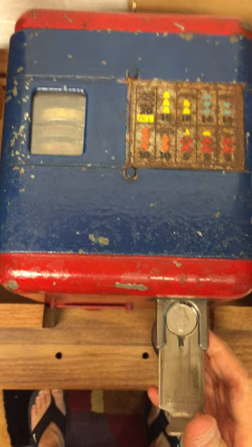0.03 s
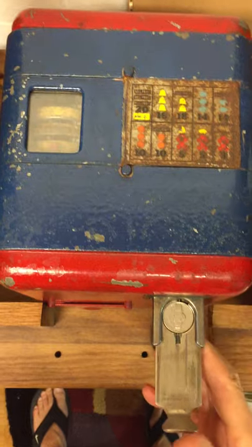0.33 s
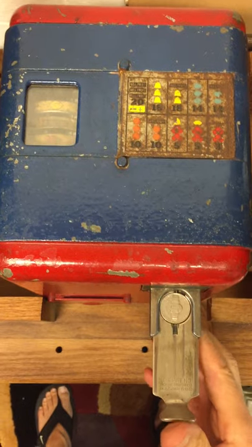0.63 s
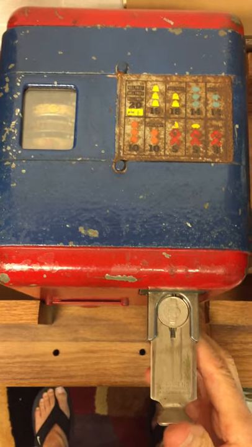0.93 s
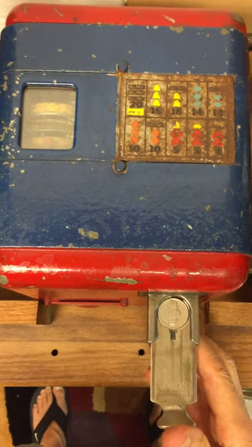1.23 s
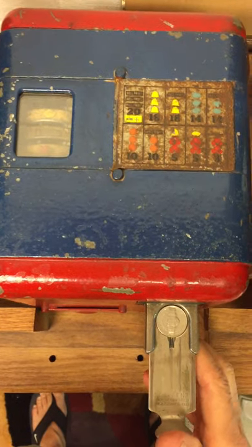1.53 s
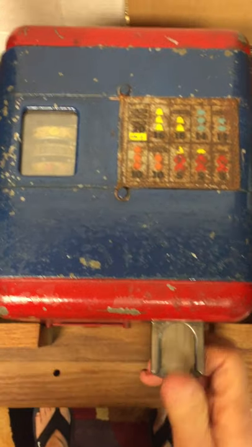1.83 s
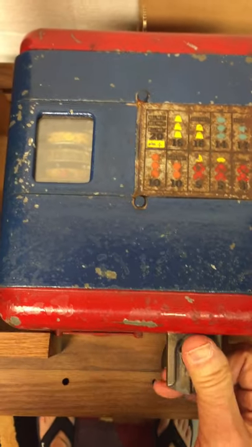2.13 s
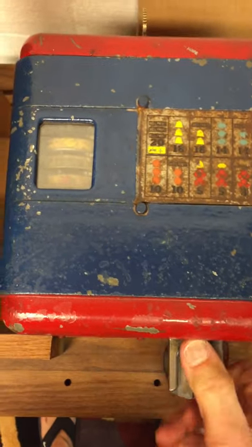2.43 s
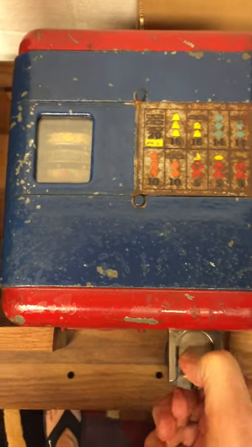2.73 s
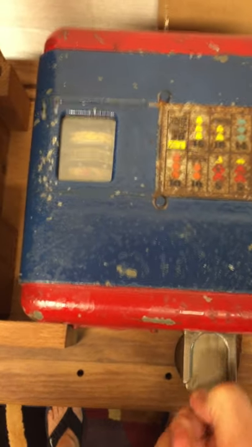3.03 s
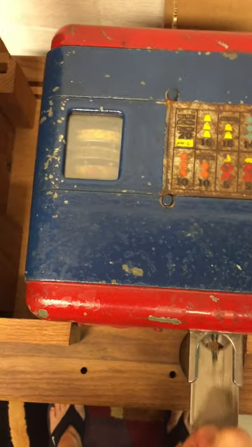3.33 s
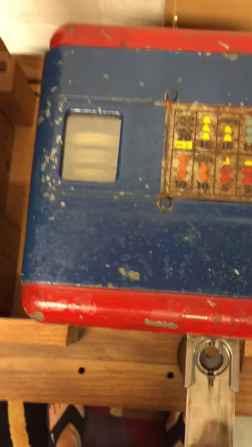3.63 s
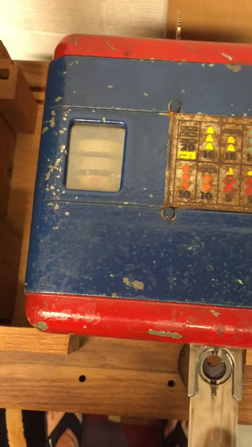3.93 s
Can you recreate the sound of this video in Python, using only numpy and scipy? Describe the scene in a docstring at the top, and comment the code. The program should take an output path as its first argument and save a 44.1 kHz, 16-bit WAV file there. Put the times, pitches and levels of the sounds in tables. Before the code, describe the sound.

A small metal slot machine clacks and rattles, heard close in a quiet room. Soft knocks and faint coin clinks start around 0.7 seconds. At 1.8 the coin slide scrapes in with a cluster of metallic clacks, followed by a knock and faint thin squeaks. From 2.8 the mechanism clacks, ticks and rattles over a low hollow rumble, slamming home loudest at 3.6. Lighter clacks follow until 4 seconds.

```python
"""A small cast-metal slot machine on a wooden table, heard from close above.
First a hand nudges the coin slide: soft knocks, faint clinks of the coin. Near 1.8 s it rams the slide
in against scraping levers, then lets it out with thin squeaks. From 2.8 s pawls tick and the works
rattle, slamming home at 3.6 s; a few lighter clacks follow. Each blow is a brief chatter of contacts
that rings up to three parts: the hollow cabinet, its metal panels and the small steel pieces."""
import sys
import numpy as np
from scipy import signal
from scipy.fft import rfft, irfft
from scipy.io import wavfile

SR = 44100
rng = np.random.default_rng(int(sys.argv[2]) if len(sys.argv) > 2 else 0)


def int16_out(signal):
    """Quantize to a 16-bit WAV file."""
    q = np.round(np.clip(np.atleast_2d(signal).T, -1, 1) * 32767)
    wavfile.write(sys.argv[1], SR, q.astype(np.int16))


N = 176400
T = np.arange(N) / SR
RING_T, CHATTER_T = T[:SR // 2], T[:SR // 12]   # time axes of one ring and of one blow
KNOCK_S, CUTOFF_HZ = 0.0065, 18200   # chatter of a soft contact; top of the treble


def clacks():
    """Levers slam; each hits the panels elsewhere and favours its own pitch, the more so if short."""
    # Each row: start in seconds, chatter in seconds, cabinet, panel and steel levels in dB,
    # favoured panel pitch in Hz.
    lever_blows = [(1.827, 0.013, -30, -31.5, -37, 1490), (1.915, 0.013, -28, -32, -59, 1010),
                   (1.966, 0.0048, -32, -20, -24, 1110), (2.029, 0.0071, -29, -21, -24.5, 1136),
                   (2.039, 0.02, -26, -25, -25.5, 1080), (2.13, 0.0053, -37.5, -28, -36.5, 975),
                   (2.141, 0.0046, -39, -37, -42, 960), (2.187, 0.0087, -37.5, -37, -41.5, 930),
                   (2.808, 0.0062, -22, -17.5, -20, 1355), (2.818, 0.014, -25.5, -23.5, -23, 1010),
                   (3.207, 0.0093, -26, -22.5, -24, 1140), (3.510, 0.0075, -29, -29, -26, 1110),
                   (3.637, 0.026, -16.5, -8, -10.5, 876), (3.662, 0.024, -23.5, -19, -19.5, 930),
                   (3.705, 0.0083, -20.5, -9.5, -19, 1360), (3.717, 0.011, -23, -16, -24, 1310),
                   (3.878, 0.008, -27, -24, -19.5, 1260), (3.889, 0.015, -27, -25, -24.5, 980),
                   (3.965, 0.013, -27.5, -29.5, -24.5, 1150)]
    out = np.zeros(N)
    for start, length_s, cabinet_db, panel_db, steel_db, hz in lever_blows:
        force = chatter(length_s)
        focus = 0.024 / length_s * resonate(force, hz, q=6.5)
        add(out, start, force, cabinet, cabinet_db)
        add(out, start, force + focus, panel, panel_db)
        add(out, start, force, steel, steel_db)
    return out


def ticks():
    """Pawls snap over teeth: one hard contact and a very short chatter, the lighter the thinner."""
    # Each row: start in seconds, steel level in dB.
    pawl_snaps = [(1.863, -23), (1.874, -33), (1.879, -31), (1.887, -33), (1.916, -35), (1.941, -33.5),
                  (1.995, -32.5), (2.040, -23), (2.064, -39), (2.100, -34.5), (2.141, -39.5),
                  (2.829, -33.5), (3.0479, -24), (3.096, -21), (3.389, -25.5), (3.427, -24.5), (3.502, -26),
                  (3.578, -29)]
    out = np.zeros(N)
    for start, db in pawl_snaps:
        force = signal.unit_impulse(len(CHATTER_T)) + unit(chatter(length_s=0.0035))
        edge_hz = min(623 * 2 ** (-db / 10.5), CUTOFF_HZ / 2)   # an octave up per 10.5 dB softer
        add(out, start, thin_below(force, edge_hz, order=2), steel, db)
        add(out, start, force, panel, db - 11)
        add(out, start, force, cabinet, db - 22)
    return out


def rattles():
    """Loose links tap one another and hardly shake the cabinet."""
    # Each row: start in seconds, panel level in dB, steel level in dB.
    link_taps = [(1.874, -31.5, -36), (1.949, -28.5, -28.5), (2.231, -47.5, -49), (2.256, -44, -54.5),
                 (2.792, -44, -40), (3.123, -37, -35), (3.169, -32, -34), (3.186, -25.5, -27),
                 (3.329, -33, -37), (3.355, -30, -36), (3.373, -30.5, -34.5), (3.588, -35.5, -39)]
    out = np.zeros(N)
    for start, panel_db, steel_db in link_taps:
        force = chatter(length_s=0.011)
        add(out, start, force, steel, steel_db)
        add(out, start, force, panel, panel_db)
        add(out, start, force, cabinet, panel_db - 17)
    return out


def scrape():
    """The slide's gritty scrape: metal faces stick and slip, ringing steel and panels."""
    # Each row: time in seconds, friction level in dB.
    rub_levels = [(1.75, -86), (1.84, -46), (1.91, -50), (1.98, -37), (2.02, -36.5), (2.09, -49),
                  (2.125, -41.5), (2.17, -57), (2.32, -83.5), (2.48, -65.5), (2.64, -77.5), (3.04, -77.5),
                  (3.11, -38.5), (3.16, -50), (3.22, -30.5), (3.26, -80), (3.38, -65), (3.395, -31.5),
                  (3.48, -34.5), (3.57, -49), (3.85, -60), (3.93, -41.5)]
    slips = np.interp(T, np.linspace(0, 4, 800), rng.standard_normal(800))
    gritty = grains(spread_db=8, size=N) * from_db(1.5 * slips)
    force = unit(gritty) * np.sqrt(N) * level(rub_levels)
    return signal.fftconvolve(force, steel() + from_db(4.5) * panel())[:N]


def cabinet_rumble():
    """The cabinet rumbles as the works move."""
    # Each row: time in seconds, level in dB.
    rumble_levels = [(1.75, -110), (1.83, -38.5), (2.1, -39), (2.28, -60), (2.72, -52.5), (2.8, -38),
                     (3.02, -57.5), (3.12, -37.5), (3.31, -57), (3.4, -38.5), (3.7, -45.5), (4.0, -33.5)]
    return signal.fftconvolve(rng.standard_normal(N) * level(rumble_levels), cabinet())[:N]


def knocks():
    """The slide knocks in its guide; the hand cushions away the treble."""
    # Each row: start in seconds, cabinet level in dB, panel level in dB.
    nudges = [(0.701, -49.5, -50.5), (.912, -67, -59.5), (1.049, -52.5, -59), (1.091, -43.5, -45.5),
              (1.470, -56.5, -55.5), (1.595, -57, -65.5), (1.772, -49, -47), (2.321, -29.5, -38),
              (2.623, -49.5, -42), (2.746, -38, -49.5)]
    cabinet_hz, panel_hz, q = 310, 980, 2.02
    out = np.zeros(N)
    for start, cabinet_db, panel_db in nudges:
        force = chatter(KNOCK_S)
        add(out, start, resonate(force, cabinet_hz, q), cabinet, cabinet_db)
        add(out, start, resonate(resonate(force, panel_hz, q), panel_hz, q), panel, panel_db)
    return out


def table_bumps():
    """Dull bumps, each a few slow cycles of the table top."""
    # Each row: centre in seconds, level in dB.
    table_thuds = [(2.539, -49.5), (3.654, -34.5), (3.9, -36.5)]
    hz, half_length_s = 97.3, 0.022
    return sum(from_db(db) * np.sin(2 * np.pi * hz * (T - centre)) * bell_fade(centre, half_length_s)
               for centre, db in table_thuds)


def clinks():
    """The loose coin shifts in its seat and touches the slide."""
    # Each row: start in seconds, centre of the band in Hz, level in dB.
    coin_touches = [(0.7, 2600, -67), (1.092, 3520, -55), (1.774, 2770, -61.5), (2.594, 5280, -40.5)]
    out = np.zeros(N)
    for start, hz, db in coin_touches:
        force = resonate(chatter(KNOCK_S), hz, q=1.1)
        add(out, start, resonate(force, hz, q=1.1), steel, db)
    return out


def squeak():
    """Thin whistles that swell and fade: sliding steel sings, and near 2.14 s the coin rings high."""
    # Each row: centre in seconds, half length in seconds, pitch in Hz, level at the crest in dB.
    thin_whistles = [(2.141, .09, 13600, -62), (2.486, 0.043, 5800, -66), (2.482, 0.063, 6560, -69),
                     (2.987, .033, 8590, -60.5), (2.988, 0.039, 13900, -70)]
    width_hz = 76
    out = np.zeros(N)
    for centre, half_length_s, hz, db in thin_whistles:
        tone = unit(resonate(rng.standard_normal(N), hz, hz / width_hz)) * np.sqrt(N)
        out += from_db(db) * tone * bell_fade(centre, half_length_s)
    return out


def cabinet():
    """The hollow body, answering a little differently wherever it is struck."""
    # Each row: pitch in Hz, relative level in dB, time to fall 60 dB in seconds.
    body_modes = [(210, -2, 0.16), (272.1, 4.5, 0.15), (313, -1.5, 0.12), (372.2, -4.5, 0.12),
                  (450.7, -4.5, 0.13)]
    # The boxy wash of lesser modes. Each row: frequency in Hz, relative level in dB.
    body_colour = [(40, -15), (85, -22.5), (135, -16), (205, -2.5), (290, 3.5), (460, -7.5), (600, -14.5),
                   (2000, -76)]
    return part(body_modes, body_colour, modes_db=-3, t60=0.13, room_db=-15, low_hz=59)


def panel():
    """The clang of the cast walls and the plates inside."""
    # Each row: pitch in Hz, relative level in dB, time to fall 60 dB in seconds.
    panel_modes = [(819.5, -1.5, 0.15), (860, 0, 0.078), (954, 0.5, 0.095), (1040, -6.5, 0.24),
                   (1109.5, -2.5, 0.11), (1196, -0.5, 0.075), (1260, -3.5, 0.047), (1452, -1.5, 0.08),
                   (1849, -12.5, 0.14)]
    # The midrange wash of lesser modes. Each row: frequency in Hz, relative level in dB.
    panel_colour = [(500, -29.5), (700, -15.5), (830, 1), (1250, -1.5), (1700, -2.5), (2100, -9),
                    (2500, -7), (3400, -15), (6000, -50)]
    return part(panel_modes, panel_colour, modes_db=-1, t60=0.066, room_db=-17.5, low_hz=610)


def steel():
    """One of the many small levers, springs and pawls, each tuned a little differently."""
    # Each row: pitch before detuning in Hz, relative level in dB, time to fall 60 dB in seconds.
    steel_modes = [(3260, 0.78, 0.12), (4335, 2.9, 0.06)]
    # The bright wash of lesser modes. Each row: frequency in Hz, relative level in dB.
    steel_colour = [(1000, -32.5), (2000, 3), (3200, 1.5), (4300, -0.5), (5200, -1), (8500, 0.5),
                    (10400, -3.5), (13000, -1.5), (16800, -2), (18500, -21)]
    tuning = 2 ** (0.08 * rng.standard_normal())
    detuned = [(hz * tuning, db, t60) for hz, db, t60 in steel_modes]
    return part(detuned, steel_colour, modes_db=-10, t60=0.071, room_db=-27.5, low_hz=1270, crack=1.8)


def part(modes, colour, modes_db, t60, room_db, low_hz, crack=0):
    """A part's answer to a tap: clear modes, a crowd of lesser ones, and the room's tail."""
    clear = np.zeros(len(RING_T))
    for hz, db, ring_s in modes:
        gain = from_db(db + 1.5 * rng.standard_normal()) * rng.choice([-1, 1])
        clear += gain * np.sin(2 * np.pi * hz * RING_T) * dying(ring_s)
    first_instant = 1 + crack * np.exp(-RING_T / 0.0027)
    crowd = noise(colour, len(RING_T)) * dying(t60) * first_instant
    room = noise(colour, len(RING_T)) * (dying(t60=0.35) - dying(t60))
    room = signal.sosfilt(signal.butter(1, 5500, fs=SR, output="sos"), room)   # furnishings dull it
    whole = from_db(modes_db) * unit(clear) + unit(crowd) + from_db(room_db) * unit(room)
    return unit(thin_below(whole, low_hz, order=3))   # the part's answer is thinned below low_hz


def chatter(length_s):
    """The force of one blow: a burst of contacts that swells quickly and dies."""
    age = CHATTER_T / length_s
    rise = np.minimum(age / 0.19, 1)
    return grains(spread_db=7, size=len(age)) * rise * np.exp(-age ** 2)


def grains(spread_db, size):
    """Dense tiny contacts of uneven strength."""
    return rng.standard_normal(size) * from_db(spread_db * np.minimum(rng.exponential(1, size), 5))


def add(out, s, force, struck, db):
    """Sound a part at time s; the level is its energy spread over a fiftieth of a second."""
    sound = unit(signal.fftconvolve(force, struck())) * np.sqrt(SR / 50)
    start = int(s * SR)
    out[start:start + len(sound)] += from_db(db) * sound[:N - start]


def room_hush():
    """Faint, dark room tone that comes in just after the start."""
    # Each row: frequency in Hz, relative level in dB.
    hush_colour = [(25, -26), (55, 3.5), (100, 4.5), (280, -1.5), (500, -8), (1800, -10.5), (9000, -19),
                   (17000, -29.5)]
    return from_db(-69) * noise(hush_colour, N) * (T > 0.082)


def noise(spectrum, size):
    """Coloured noise of rms one."""
    hz, db = np.transpose(spectrum)
    gain = from_db(np.interp(np.log(np.fft.rfftfreq(size, 1 / SR) + 1), np.log(hz), db))
    return unit(irfft(rfft(rng.standard_normal(size)) * gain, size)) * np.sqrt(size)


def resonate(x, hz, q):
    """One resonance with a gain of one on top."""
    return signal.lfilter(*signal.iirpeak(hz, q, fs=SR), x)


def thin_below(x, hz, order):
    """Roll off the lows."""
    return signal.sosfilt(signal.butter(order, hz, "high", fs=SR, output="sos"), x)


def dying(t60):
    """Exponential decay."""
    return np.exp(-np.log(1000) * RING_T / t60)


def bell_fade(centre, half_length_s):
    """A bell-shaped fade in and out."""
    return np.exp(-((T - centre) / half_length_s) ** 2)


def level(rows):
    """Gain over time from (s, dB) rows."""
    return from_db(np.interp(T, *np.transpose(rows)))


def from_db(db):
    """Decibels to gain."""
    return 10 ** (np.asarray(db) / 20)


def unit(x):
    """Scale to an energy of one."""
    return x / np.sqrt(np.sum(x ** 2) + 1e-20)


def scene():
    """The machine in a quiet room, in mono."""
    hush = room_hush()
    contacts = clacks() + rattles() + knocks() + clinks() + ticks()
    rumble = cabinet_rumble()
    scraping = (scrape() + scrape()) / np.sqrt(2)   # two random draws blended for a smoother tone
    return (contacts + scraping + rumble + squeak() + table_bumps() + hush)[None]


def record(dry):
    """The loudest peaks are rounded off and the top is cut."""
    rounded = dry / (1 + dry ** 4) ** .25
    return signal.sosfilt(signal.cheby2(14, 60, CUTOFF_HZ, fs=SR, output="sos"), rounded)


dry = scene()
out = record(dry)
int16_out(out)
```